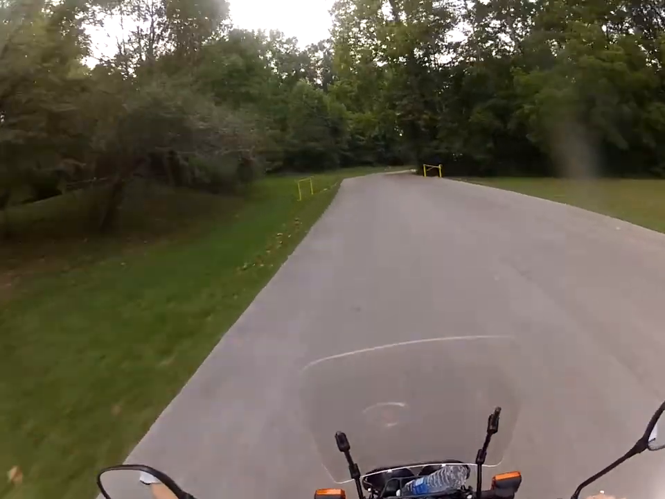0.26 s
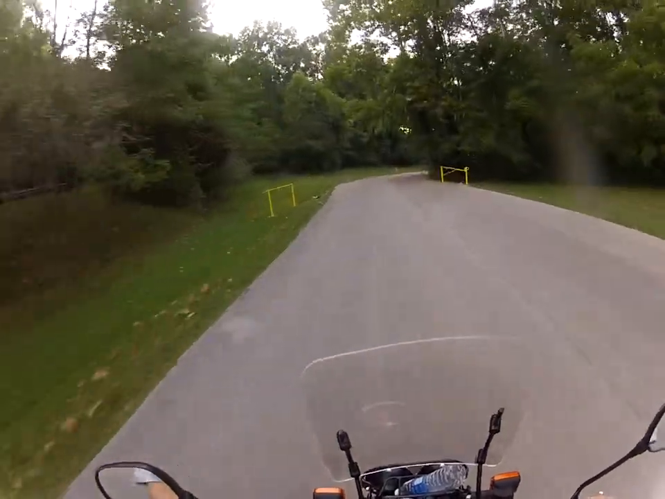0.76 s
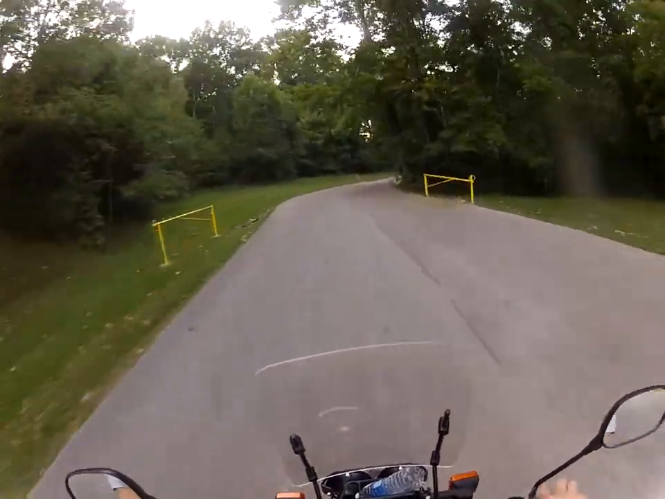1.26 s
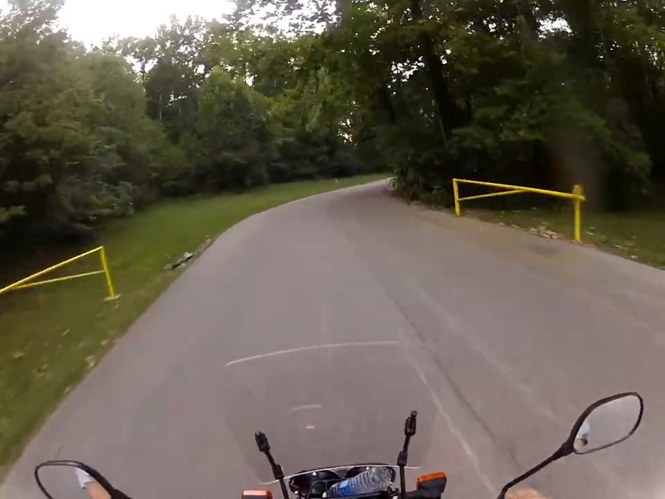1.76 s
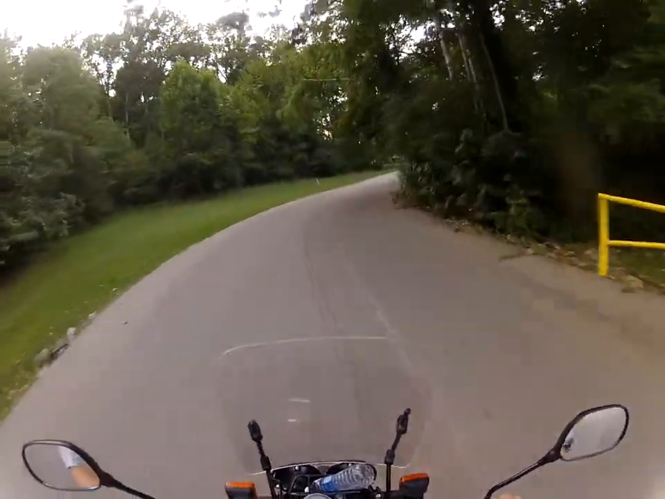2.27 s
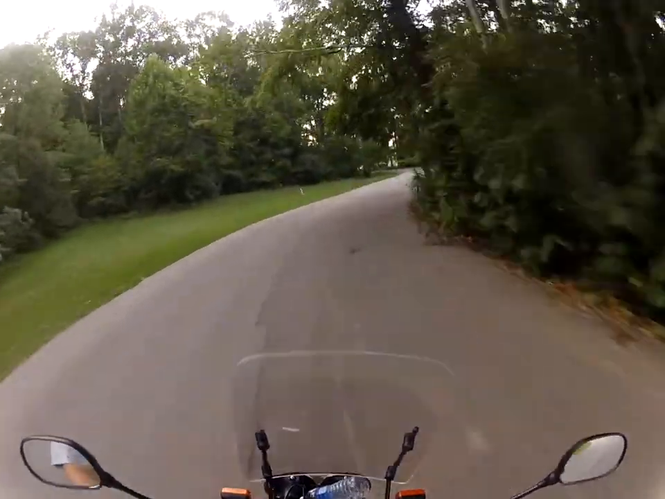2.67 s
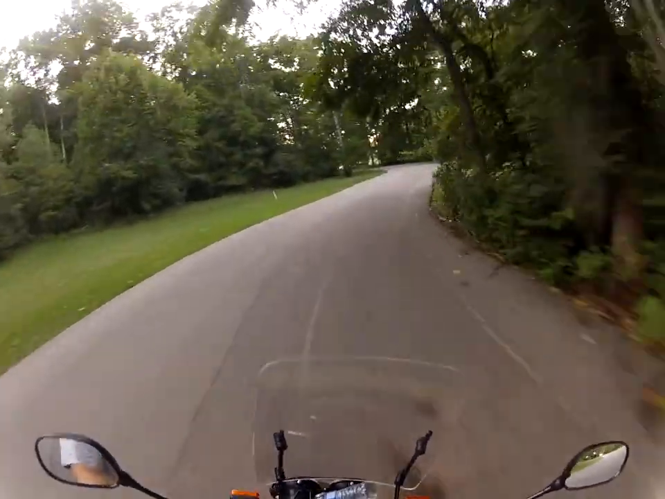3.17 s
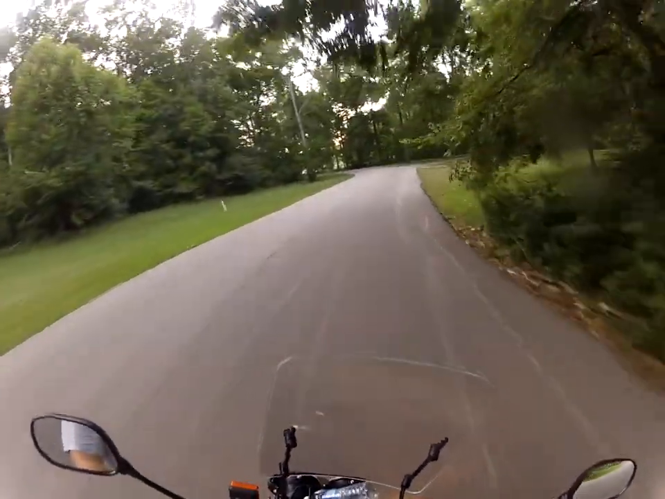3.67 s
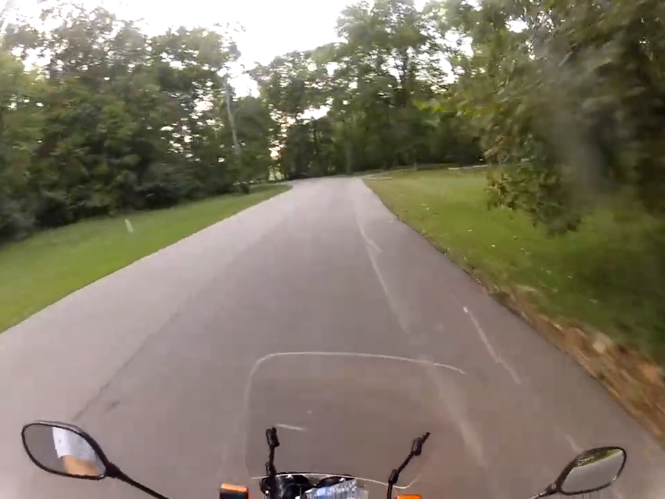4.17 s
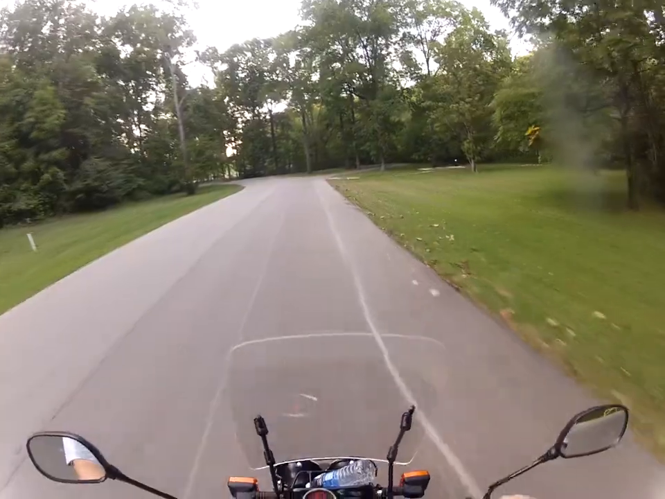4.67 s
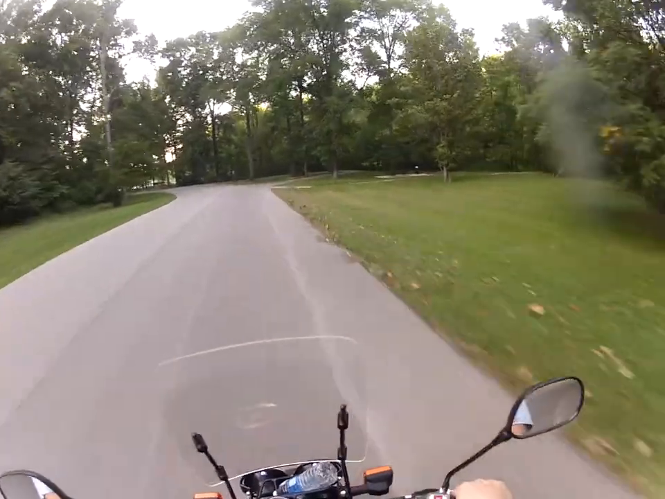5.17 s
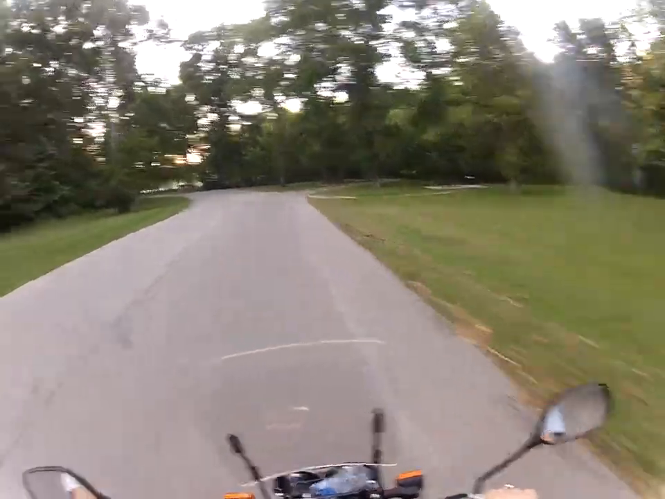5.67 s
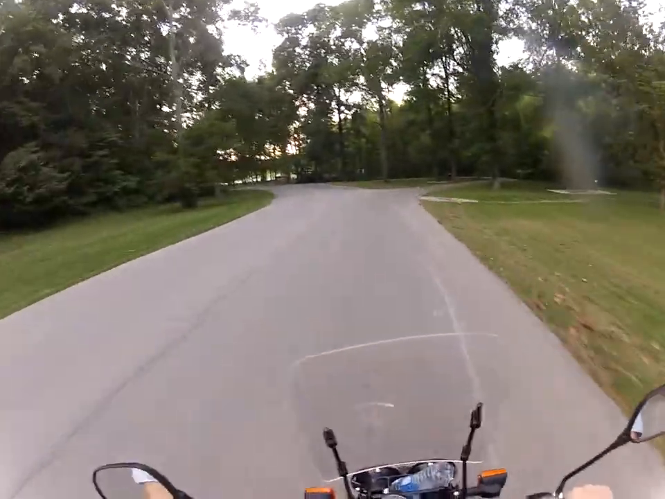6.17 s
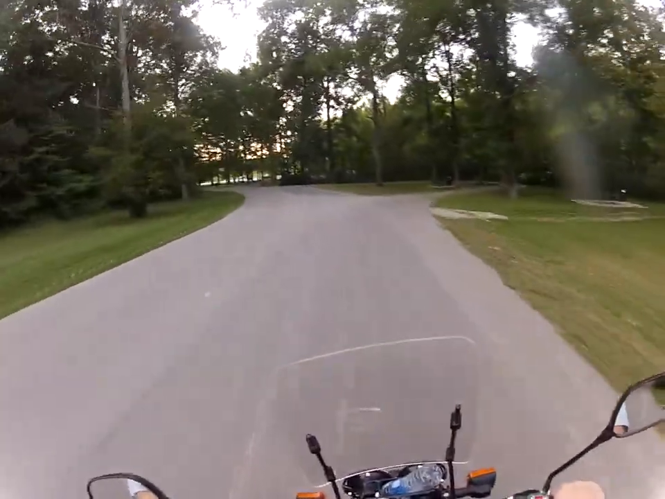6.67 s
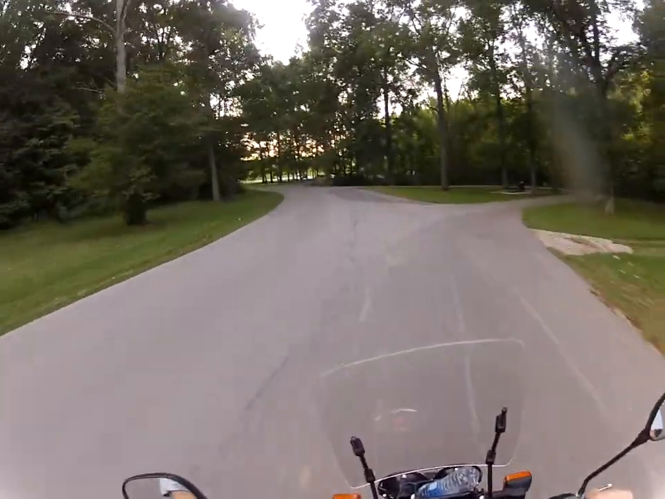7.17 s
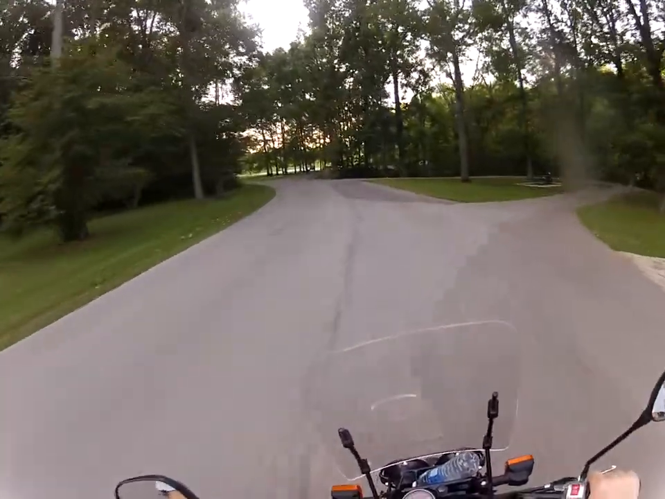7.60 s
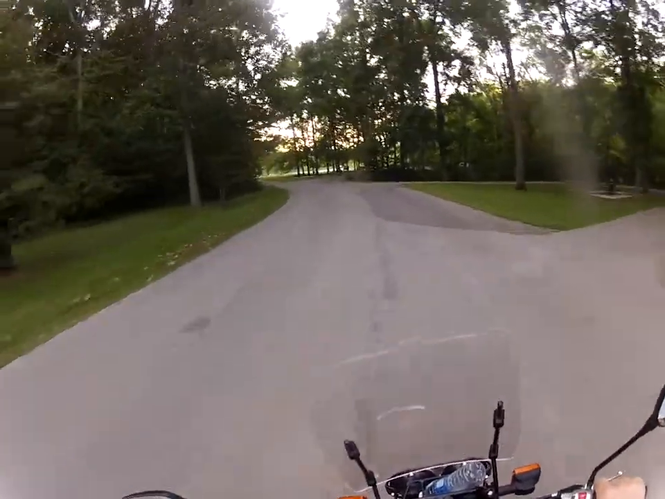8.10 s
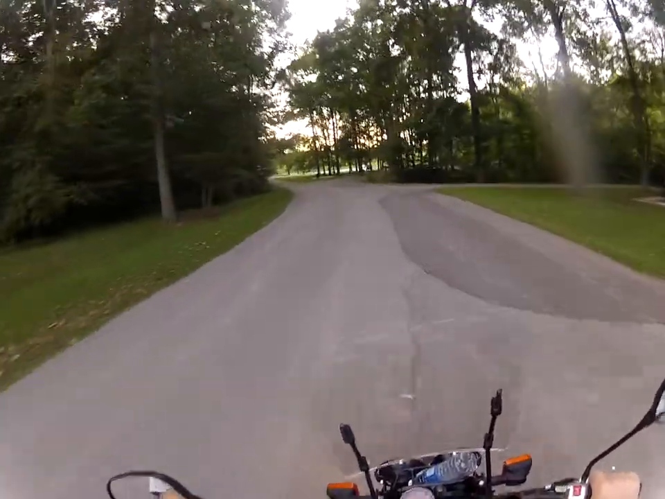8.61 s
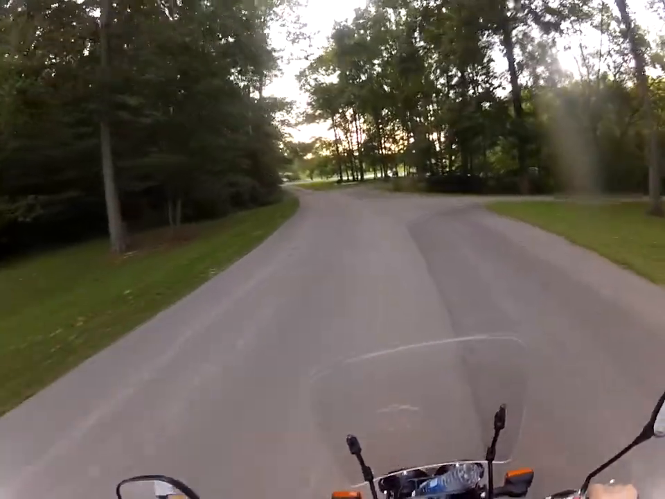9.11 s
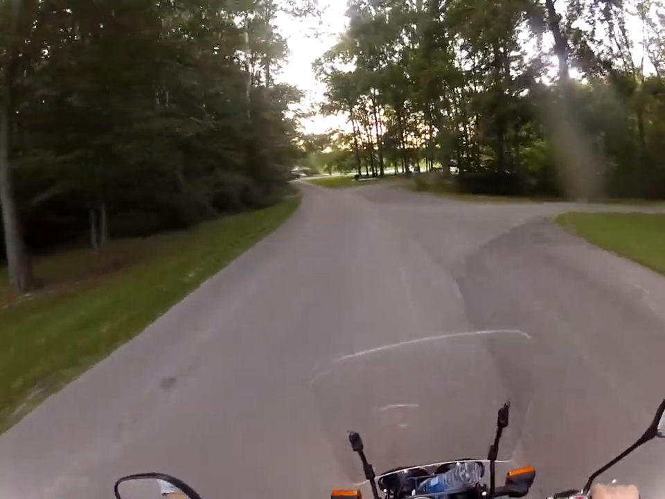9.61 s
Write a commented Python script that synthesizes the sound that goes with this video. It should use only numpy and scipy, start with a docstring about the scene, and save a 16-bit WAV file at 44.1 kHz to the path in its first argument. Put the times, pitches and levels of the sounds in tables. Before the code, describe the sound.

Wind buffets a camera case on a moving scooter, fluttering, thumping and hissing over road roar, with a faint engine beneath, gradually easing off.

```python
"""A small scooter rides along a park road, heard from a camera in a plastic case behind the windscreen.
From the start, eddies from the screen beat on the case about twelve times a second: noise swelling with them
rumbles, roars and hisses, clicks chatter, and faint engine harmonics lie below. Pressure dips thump throughout;
from 0.2 s the case knocks and buzzes on its mount. The wind eases as the scooter slows, the rush dulls
from 5.6 s, and the engine rises near 5 s and again after 8 s. Sample-and-hold mirroring adds a sizzling treble."""
import sys
import numpy as np
from scipy import signal
from scipy.fft import rfft, irfft, next_fast_len
from scipy.io import wavfile
from scipy.ndimage import uniform_filter1d

SR = 44100
rng = np.random.default_rng(int(sys.argv[2]) if len(sys.argv) > 2 else 0)


def transcribe(signal):
    """Save signal, clipped to [-1, 1], as a 16-bit WAV file at the path in sys.argv[1]."""
    frames = np.atleast_2d(signal).T
    limited = np.clip(frames, -1, 1)
    pcm = np.round(limited * 32767).astype(np.int16)
    wavfile.write(sys.argv[1], SR, pcm)


N = 434385


def from_db(db):
    """Decibels to amplitude gain."""
    return 10 ** (np.asarray(db) / 20)


def in_time(rows):
    """Interpolate each column after the first (time_s) at every sample."""
    time_s, *columns = np.transpose(rows)
    return [np.interp(np.arange(N) / SR, time_s, column) for column in columns]


def gain_at(points, hz):
    """Spectrum gain, interpolated in dB over log frequency."""
    point_hz, db = np.transpose(points)
    return from_db(np.interp(np.log(hz + 1e-3), np.log(point_hz), db))


def colour(x, points):
    """Zero-phase filter with the given spectrum."""
    size = next_fast_len(N + 8192)
    spectrum = rfft(x, size) * gain_at(points, np.fft.rfftfreq(size, 1 / SR))
    return irfft(spectrum, size)[:N]


def unit_in(x, band_hz):
    """Scale x to rms 1 within a band."""
    bandpass = signal.butter(4, band_hz, "band", fs=SR, output="sos")
    return x / np.std(signal.sosfilt(bandpass, x))


def drift(corner_hz):
    """Smooth random wander of spread 1: two-pole lowpassed noise, drawn every 20 samples."""
    pole = np.exp(-40 * np.pi * corner_hz / SR)
    noise = rng.standard_normal(N // 20 + 2002)
    slow = signal.lfilter([1], [1, -2 * pole, pole * pole], noise)[2000:]  # drop the filter's start-up
    return np.interp(np.arange(N) / 20, np.arange(len(slow)), slow / slow.std())


def swell(db):
    """Fast gain, normalised to unit mean power over a sliding third of a second."""
    gain = from_db(db)
    return gain / np.sqrt(uniform_filter1d(gain ** 2, size=SR // 3))


def fade(strikes, decay_s):
    """Each strike jumps up at once and decays exponentially."""
    return signal.lfilter([1], [1, -np.exp(-1 / (decay_s * SR))], strikes + 1e-18)


# windscreen shedding: time_s, eddies_per_s
SHEDDING_CURVE = [(0, 12.2), (0.8, 13.0), (1.6, 12.4), (2.4, 12.3), (3.2, 11.7), (4, 12.5), (4.8, 11.6),
                  (5.6, 11.0), (6.4, 11.1), (7.1, 13.9), (7.8, 13.0), (8.5, 12.4), (9.2, 10.8),
                  (9.85, 10.2)]


def shedding():
    """Eddy phase in radians: one turn per eddy shed from the windscreen."""
    eddies_per_s, = in_time(SHEDDING_CURVE)
    return 2 * np.pi * np.cumsum(eddies_per_s) / SR


# eddies blur together in fast air and stand apart in slow air
SWING_DB, SWING_DB_PER_FLOW_DB = 2.6, .19  # swing at cruise; growth as the flow eases


def buffeting(turn, flow_db, uneven_db=1.65, steepness=0.42, varies=.35, wander_rad=.4):
    """Case pressure in dB: each eddy arrives quickly and trails away, uneven in strength and spacing."""
    mean_swing_db = np.maximum(SWING_DB - SWING_DB_PER_FLOW_DB * flow_db, 0)
    swing_db = mean_swing_db * np.maximum(1 + varies * drift(5), 0)
    turn = turn + wander_rad * drift(6)
    eddy = np.cos(turn) - steepness * np.sin(2 * turn)
    return swing_db * eddy + uneven_db * drift(25.6)


# wind rumble spectrum: freq_hz, density_db (relative, per Hz)
RUMBLE_SPECTRUM = [(15, -9), (28, -9.5), (42, -4), (56, 1), (90, -5), (140, -7), (195, -8.3), (255, -14),
                   (320, -16.7), (410, -24), (700, -37), (2000, -78)]


def wind(buffet_db, follow=0.87, lumpy_db=1.5):
    """Low turbulence: coloured noise swelling with the buffeting."""
    air = colour(rng.standard_normal(N), RUMBLE_SPECTRUM)
    air = air * swell(follow * buffet_db + lumpy_db * drift(25.6))
    return unit_in(air, (25, 350))


# case modes, resonance above 0 dB, cancellation below: freq_hz, width_hz, gain_db
CASE_MODES = [(707, 98, 3.5), (1150, 210, 4), (1666, 92, 2.5), (2088, 170, 4.5), (2503, 186, 6.5),
              (2788, 176, -9.5), (3015, 100, 5.5), (3520, 120, 4), (3734, 140, 5), (4523, 184, 8.5)]


def case(x):
    """Ringing plastic case: peaking filters in series."""
    for hz, width_hz, db in CASE_MODES:
        root_gain = from_db(db / 2)
        half_width = np.pi * width_hz / SR
        middle = -2 * np.cos(2 * np.pi * hz / SR)
        zeros = [1 + half_width * root_gain, middle, 1 - half_width * root_gain]
        poles = [1 + half_width / root_gain, middle, 1 - half_width / root_gain]
        x = signal.lfilter(zeros, poles, x)
    return x


# road roar spectrum before the case: freq_hz, density_db (relative, per Hz)
ROAR_SPECTRUM = [(150, -8), (400, -1), (700, -1.5), (1500, -2), (2400, -2), (3400, -9.5), (4300, -20.5),
                 (5200, -20), (6000, -31)]
# road roar, falling with speed: time_s, level_db (rms, 500-1600 Hz, before the treble shelf)
ROAR_CURVE = [(0, -45.3), (1, -44.3), (2, -46.2), (4.5, -47.7), (5.7, -47), (7, -49.2), (9.85, -52.7)]


def road(buffet_db, follow=0.49, flicker_db=1.0):
    """Smoother roar of tyres and passing air: noise through the case, swelling less with the eddies."""
    roar_db, = in_time(ROAR_CURVE)
    roar = colour(rng.standard_normal(N), ROAR_SPECTRUM)
    roar = roar * swell(follow * buffet_db + flicker_db * drift(31))
    return from_db(roar_db) * unit_in(case(roar), (500, 1600))


def contacts(per_s, spread_db):
    """Random tiny impacts of uneven strength and either sign; rms 1."""
    sizes = from_db(spread_db * np.minimum(rng.exponential(1, N), 4)) * rng.choice([-1, 1], N)
    clicks = sizes * (rng.random(N) < per_s / SR)
    return clicks / clicks.std()


def jolts(per_s=30, jolt_db=5.6, jolt_s=.012):
    """Small random jolts in dB: instant rise, decay, soft ceiling at jolt_db."""
    return jolt_db * np.tanh(fade(rng.random(N) < per_s / SR, jolt_s))


# hiss and contact spectrum before the case: freq_hz, density_db (relative, per Hz)
HISS_SPECTRUM = [(200, -26), (700, -9), (1500, -7.5), (2100, 0), (2600, 2.5), (3500, -11), (4200, -17.5),
                 (5200, -18.5), (5700, -22), (6000, -28.5)]


def chatter(buffet_db, firing, follow=0.99, grain=0.67, air=0.73, shake_db=0.7, gust_db=0.7):
    """Eddies hiss over the case and jolt it into chatter; the engine shakes it twice per firing."""
    drive = grain * contacts(per_s=1100, spread_db=2.5) + air * rng.standard_normal(N)
    shake = shake_db * np.cos(2 * firing)
    drive = drive * swell(follow * buffet_db + gust_db * drift(7) + shake + jolts())
    return unit_in(case(colour(drive, HISS_SPECTRUM)), (1800, 3800))


# engine, rising twice as the throttle opens: time_s, firings_per_s, level_db (rms)
ENGINE_CURVE = [(0, 49.7, -62), (4, 48.4, -57), (5.3, 49.6, -52), (6.6, 48, -62), (8.1, 47.4, -59),
                (8.7, 48.7, -54), (9.2, 49.2, -53.5), (9.85, 49.1, -52.5)]
# exhaust harmonics: freq_hz, amplitude_db (relative)
EXHAUST_SPECTRUM = [(45, -2), (200, -2), (330, -9.5), (400, -7), (450, -4.5), (495, -3), (540, 2.5),
                    (595, -16), (1200, -18)]


def engine(firing, rough=.2):
    """Harmonics of the single cylinder's firing, weighted by the silencer at the starting rate; rms 1."""
    orders = np.arange(1, 23)
    gains = gain_at(EXHAUST_SPECTRUM, orders * ENGINE_CURVE[0][1])
    hum = np.zeros(N)
    for order, gain in zip(orders, gains):
        uneven = 1 + rough * drift(9.7)
        hum += gain * uneven * np.cos(order * firing + rng.uniform(0, 2 * np.pi))
    return hum / hum.std()


# lesser cores: share of eddies with one, dB over the rumble curve (before thump gain), dB spread, s scatter
CORE_SHARE, CORE_OVER_RUMBLE_DB, CORE_SPREAD_DB, CORE_SCATTER_S = .65, 5.0, 1.8, .009


def weak_cores(turn, rumble_db):
    """Lesser eddy cores as (time_s, suction_db) rows, each near the crest of its eddy."""
    crests = np.flatnonzero(np.diff(turn // (2 * np.pi)))
    late, strong = rng.standard_normal((len(crests), 2)).T
    time_s = crests / SR + CORE_SCATTER_S * late
    suction_db = rumble_db[crests] + CORE_OVER_RUMBLE_DB + CORE_SPREAD_DB * strong
    return np.c_[time_s, suction_db][rng.random(len(crests)) < CORE_SHARE]


# strongest eddy cores crossing the microphone: time_s, suction_db (before thump gain and rim)
STRONG_CORES = [(0.478, -17), (0.599, -16.5), (0.785, -20), (1.117, -21), (2.039, -21), (2.428, -21.5),
                (2.707, -20), (3.383, -21), (4.787, -20.5), (4.854, -22), (5.229, -22), (6.163, -18.5),
                (6.663, -22), (7.933, -23.5)]


def thumps(lesser_cores, core_s=0.0028, size_spread=0.35, rim=3.1, thump_db=2.5):
    """Each core is a short pressure dip inside a wider, weaker rim of raised pressure."""
    cores = [*STRONG_CORES, *lesser_cores]
    t, out = np.arange(N) / SR, np.zeros(N)
    for (s, db), size in zip(cores, rng.standard_normal(len(cores))):
        near = slice(max(int(s * SR) - SR // 8, 0), int(s * SR) + SR // 8)
        radius = (t[near] - s) / (core_s * np.exp(size_spread * size))
        raised = np.exp(-(radius / rim) ** 2) / rim
        out[near] += from_db(db + thump_db) * (raised - np.exp(-radius ** 2))
    return out


# case knocks on its mount, before gains and filters: time_s, strike_db, buzz_db
KNOCK_EVENTS = [(0.229, -19, -29.5), (0.458, -25, -32), (1.027, -25, -35.5), (1.568, -24, -41),
                (2.53, -27, -39), (2.869, -24, -41), (4.783, -27, -38), (5.742, -28, -44),
                (6.181, -25, -39), (6.726, -30, -42), (7.255, -25, -38.5), (7.562, -30, -39),
                (7.703, -29, -37), (7.789, -21, -40), (8.105, -29, -39), (8.244, -29, -41),
                (8.754, -29, -42), (9.003, -30, -35), (9.105, -33, -39), (9.169, -31, -43),
                (9.553, -30, -39), (9.662, -26, -35)]


def knocks(strike_db=0.3, buzz_db=2.2, buzz_s=.019, build_s=.0012, soft_hz=3700):
    """Plastic strikes plastic, then a short buzz of rebounds builds and dies."""
    strikes, rebounds = np.zeros((2, N))
    for s, hit_db, rebound_db in KNOCK_EVENTS:
        strikes[int(s * SR)], rebounds[int(s * SR)] = from_db([hit_db, rebound_db])
    soft = signal.butter(2, [1200, soft_hz], "band", fs=SR, output="sos")
    rattle = colour(contacts(per_s=4000, spread_db=2.0), HISS_SPECTRUM)
    buzz, hits = case(signal.sosfilt(soft, [rattle, colour(strikes, HISS_SPECTRUM)]))
    hits = hits * strikes.max() / np.abs(hits).max()
    rebounding = fade(rebounds, buzz_s) - fade(rebounds, build_s)
    return from_db(strike_db) * hits + from_db(buzz_db) * rebounding * buzz / buzz.std()


def lull(lift_s=0.011, lull_db=-7.0):
    """Chatter gain: the case lifts clear just before each knock, so its chatter sinks."""
    landings = np.zeros(N)
    landings[[int(row[0] * SR) for row in KNOCK_EVENTS]] = 1
    lift = fade(landings[::-1], lift_s)[::-1]  # time-reversed decay: rises into the knock
    return from_db(lull_db * lift)


# the rush dulls as the air slows
TREBLE_FAST_DB, TREBLE_SLOW_DB = .3, -2.2
DULL_START_S, DULL_END_S = 5.6, 6.9


def dull(rush, edge_hz=3300):
    """Moving treble shelf, sinking from its fast-air to its slow-air gain."""
    treble_db = np.interp(np.arange(N) / SR, [DULL_START_S, DULL_END_S], [TREBLE_FAST_DB, TREBLE_SLOW_DB])
    top = signal.sosfiltfilt(signal.butter(2, edge_hz, "high", fs=SR, output="sos"), rush)
    return rush + top * (from_db(treble_db) - 1)


# airflow, easing as the scooter slows: time_s, rumble_db, hiss_db (both before scene trims)
AIRFLOW_CURVE = [(0, -30.5, -35.7), (0.55, -29, -34.3), (1.4, -33, -39), (2.2, -33.3, -39.3),
                 (3.3, -36, -42.5), (4.3, -36.7, -43.2), (4.8, -34.3, -43.2), (5.6, -33.5, -43.5),
                 (6.2, -36.7, -43.3), (7.1, -36.2, -42), (8.4, -36.8, -46.8), (9.0, -37.3, -45.8),
                 (9.85, -39.7, -48.5)]
CRUISE_HISS_DB = -42  # hiss_db at cruising speed


def scene(wind_trim_db=-1.1, chatter_trim_db=-1.2):
    """Mix at one microphone; the airflow sets rumble, hiss and buffeting depth."""
    rumble_db, hiss_db = in_time(AIRFLOW_CURVE)
    firings_per_s, engine_db = in_time(ENGINE_CURVE)
    turn = shedding()
    firing = 2 * np.pi * np.cumsum(firings_per_s) / SR
    buffet_db = buffeting(turn, hiss_db - CRUISE_HISS_DB)
    low = from_db(rumble_db + wind_trim_db) * wind(buffet_db)
    rush = road(buffet_db)
    rush = rush + from_db(hiss_db + chatter_trim_db) * chatter(buffet_db, firing) * lull()
    machine = from_db(engine_db) * engine(firing) + knocks()
    low = low + thumps(weak_cores(turn, rumble_db))
    return (low + dull(rush) + machine)[None]


HOLD_HZ, CUTOFF_HZ = 12000, 15400


def record(dry, sizzle_db=0.5):
    """The camera samples slowly and holds each value, mirroring the sound into a sizzling treble."""
    size = next_fast_len(N + 8192)
    hz = np.fft.rfftfreq(size, 1 / SR)
    narrow = irfft(rfft(dry, size) * (hz < HOLD_HZ / 2), size)
    carrier = np.cos(2 * np.pi * HOLD_HZ * np.arange(size) / SR)
    mirrored = narrow * (1 + 2 * from_db(sizzle_db) * carrier)
    hold = np.sinc(hz / HOLD_HZ)
    top_cut = 1 / np.sqrt(1 + np.minimum(hz / CUTOFF_HZ, 1.1) ** 900)
    return irfft(rfft(mirrored) * hold * top_cut, size)[:, :N]


dry = scene()
out = record(dry)
transcribe(out)
```